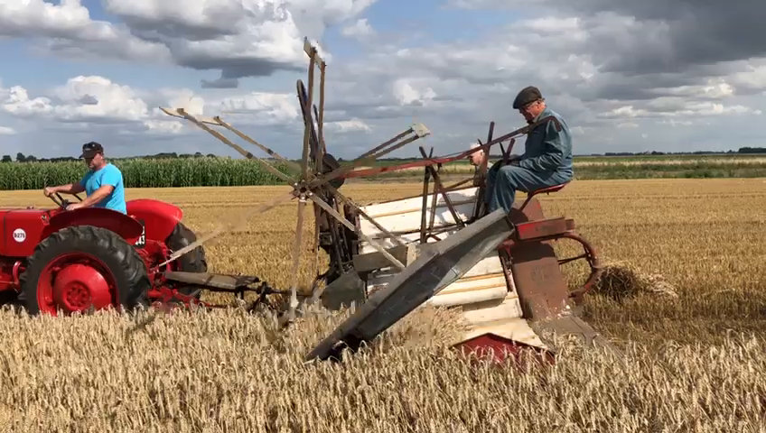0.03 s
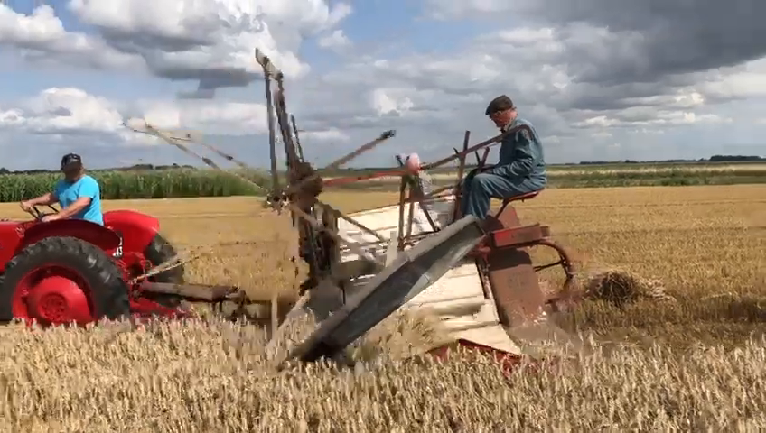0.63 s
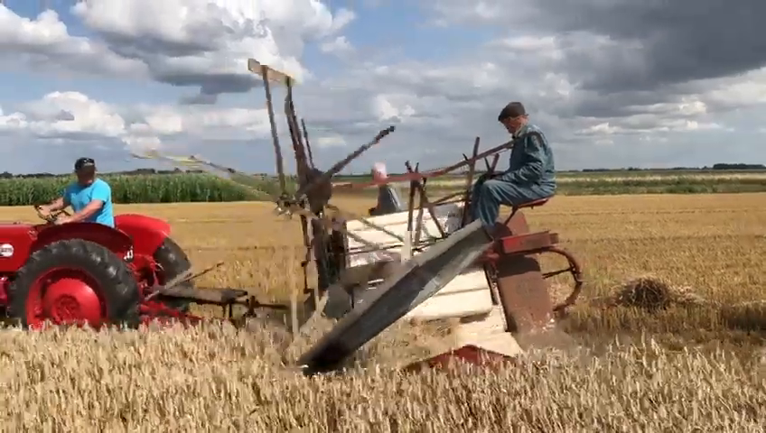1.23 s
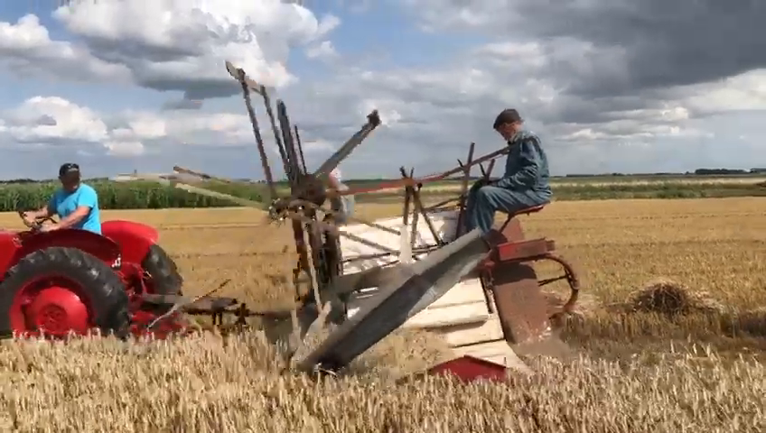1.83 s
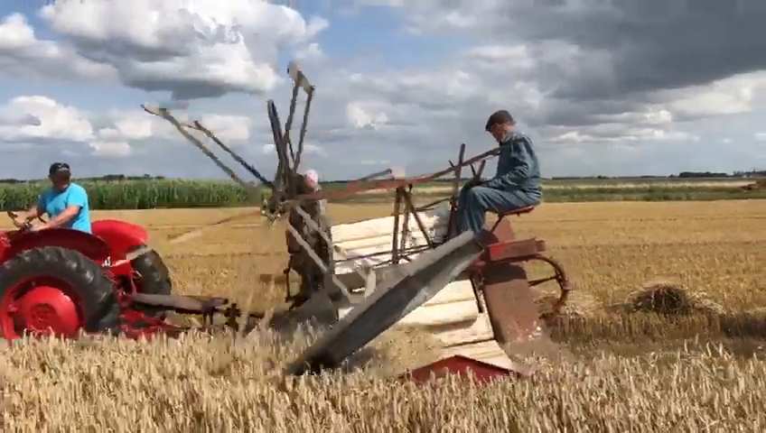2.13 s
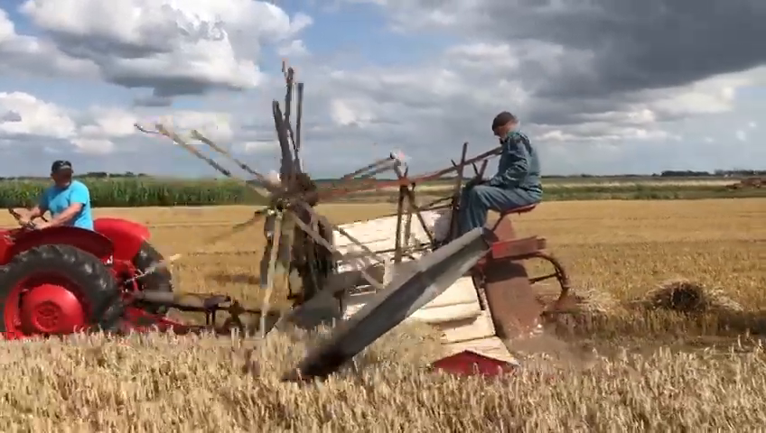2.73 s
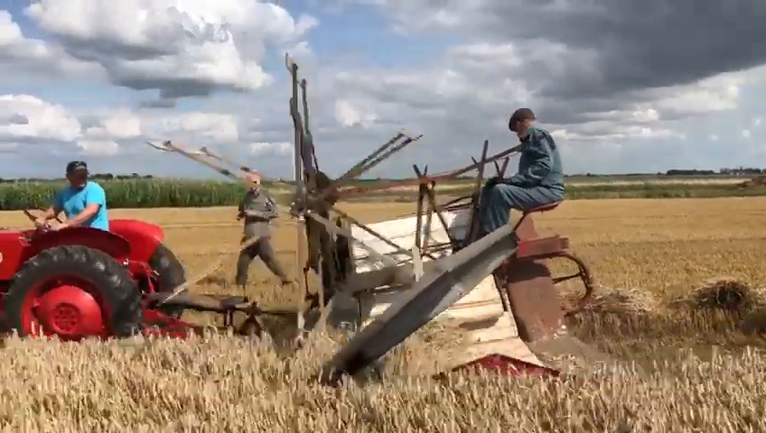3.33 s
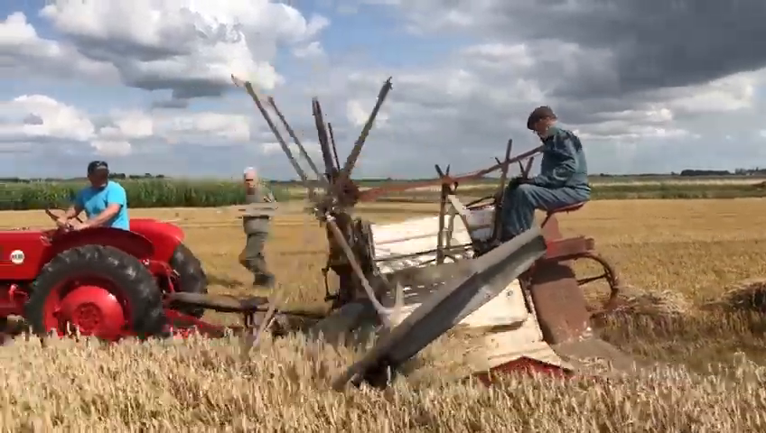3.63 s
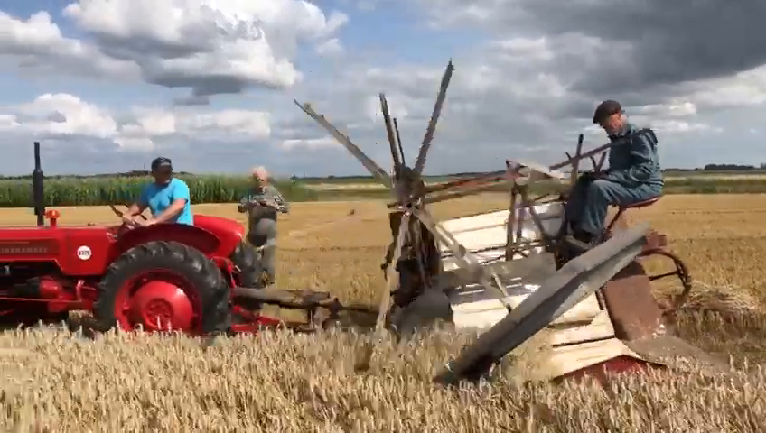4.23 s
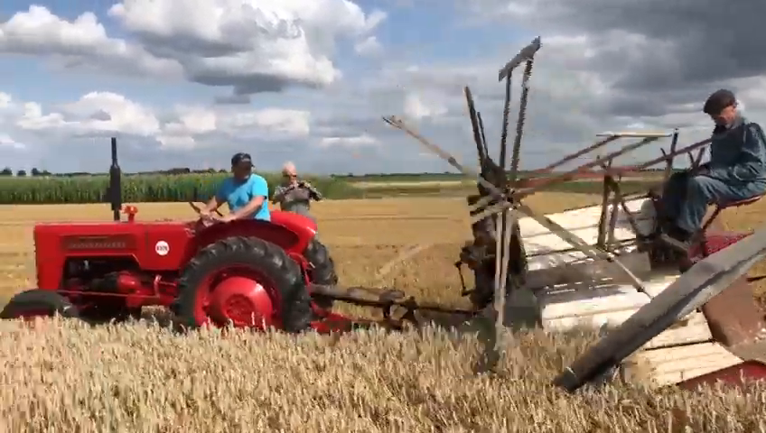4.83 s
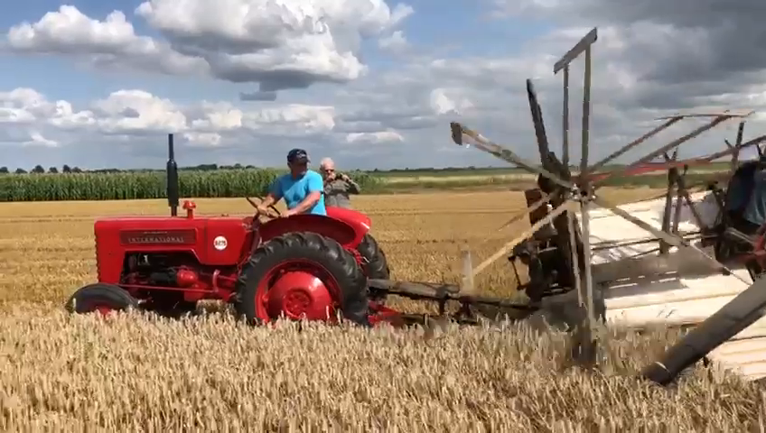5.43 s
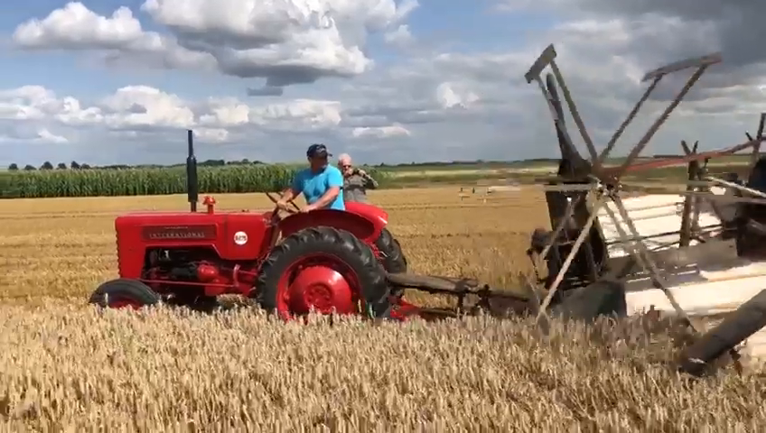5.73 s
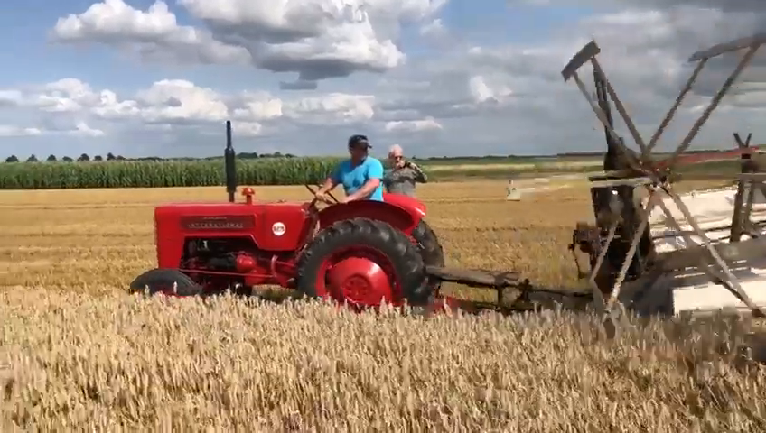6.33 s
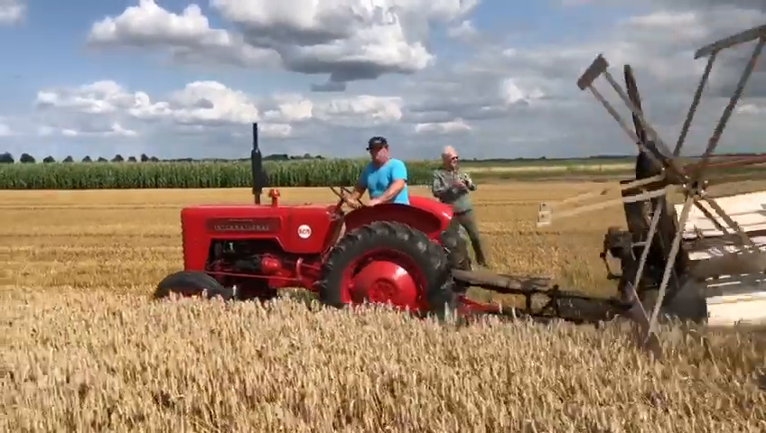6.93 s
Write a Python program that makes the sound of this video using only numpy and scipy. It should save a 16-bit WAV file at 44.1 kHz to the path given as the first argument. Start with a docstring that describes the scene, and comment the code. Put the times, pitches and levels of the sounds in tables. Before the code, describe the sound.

A diesel tractor drones from start to finish, about seven seconds, with a rapid engine knock and a faint wavering gear whine. The old reaper it tows adds a low rumble, a continuous rattle of chains and slats, and irregular iron clanks, wooden knocks and small ticks. Dry straw rustles and snaps through it, swelling gently about every two and a half seconds. A dry bearing gives short, high squeaks, frequent until about 4 seconds, then sparser and fainter. Hollow thuds come near 1.4 and 2.2 seconds. The engine rises slightly around 4 seconds and sags around 5.5, its knocking and ticking growing clearer as the rig draws a little nearer. Brief low puffs of wind bump the microphone near 4.5, 5.5 and 6.9 seconds. At about 6.4 the machine jolts with a thud and extra clatter. The field is open, with no echo.

```python
"""A four-cylinder diesel tractor tows an old reaper-binder through standing grain in an open field.
The exhaust drones, the gears whine and the engine knocks once per firing. Behind it the binder
rumbles, rattles, clanks and chirps at a dry bearing while straw rustles through, swelling with
each sheaf. The rig draws slightly nearer to one microphone, which a few puffs of wind bump."""
import sys
import numpy as np
from scipy import signal
from scipy.fft import rfft, irfft, next_fast_len
from scipy.io import wavfile
from scipy.ndimage import map_coordinates

SR = 44100
rng = np.random.default_rng(int(sys.argv[2]) if len(sys.argv) > 2 else 0)


def generate_wav(signal):
    """Clip the signal to [-1, 1] and save it as 16-bit WAV at the path in sys.argv[1]."""
    frames = np.transpose(np.atleast_2d(signal))
    scaled = np.clip(frames, -1, 1) * 32767
    pcm = np.round(scaled).astype(np.int16)
    wavfile.write(sys.argv[1], SR, pcm)


N = 308700

# the rig's nearness to the microphone, as a gain: t/s, level/dB
NEARNESS = [(0, -0.5), (1.2, -1), (3, 0.5), (4, 1.6), (5.3, 1.2), (6.3, 2.43), (7, 1.5)]


def tractor():
    """Exhaust, gears and cylinders all run locked to one count of the firings."""
    # engine speed: t/s, firing rate/Hz
    speed = [(0, 42), (3, 41.5), (4, 43.9), (4.3, 44.2), (4.8, 43), (5.5, 39.5), (6.3, 41), (7, 42.5)]
    firings = np.cumsum(curve(speed)) / SR
    return exhaust(firings) + gear_whine(firings) + combustion(firings)


def exhaust(firings):
    """The exhaust pulses drone; the upper tones brighten as the tractor nears."""
    # exhaust tones: multiple of the firing rate, relative level/dB
    orders = [(1, -15.5), (1.5, -13), (2, -0.5), (3, -6), (4, -14.5), (5, -17), (6, -16.5)]
    lift_db = 0.88 * curve(NEARNESS)
    tones = np.zeros(N)
    for k, db in orders:
        gain = amp(db + lift_db * (k > 2) + 0.63 * wobble(10))
        tones += gain * np.sin(2 * np.pi * (k * firings + rng.random()))
    return np.sqrt(2) * amp(level_db("exhaust")) * tones


def gear_whine(firings):
    """Meshing gears whine; backlash makes them waver in level and phase."""
    # mesh tones: multiple of the firing rate, relative level/dB
    meshes = [(15.5, -3), (24, 1)]
    # whine at the microphone: t/s, level/dB
    whine = [(0, -51), (1.1, -46.5), (2.5, -45.5), (3.3, -50), (7, -55)]
    tones = np.zeros(N)
    for k, db in meshes:
        tones += amp(db + 2.2 * wobble(5)) * np.sin(2 * np.pi * k * firings + 1.45 * wobble(14))
    return np.sqrt(2) * amp(curve(whine)) * tones


def combustion(firings):
    """Each firing knocks the block and ticks an injector, a little early or late, never equally hard."""
    # spectrum of the engine block: f/Hz, level/dB
    block = [(150, -26.5), (350, -4.5), (640, 5.5), (850, -4), (1250, -0.5), (2000, -8), (3000, -13.5),
             (4500, -14.5), (7000, -29), (12000, -38)]
    # spectrum of the injector ticks: f/Hz, level/dB
    injectors = [(1500, -36), (3000, -8), (4700, 5), (6800, 0.5), (8500, -6), (10300, -14), (12000, -17)]
    # the ticks grow as the engine's side comes into view: t/s, level/dB
    ticking = [(0, -71), (2.3, -45.5), (3, -42), (4.5, -47), (5.4, -41.5), (6.3, -39.5), (7, -39)]
    starts = np.flatnonzero(np.diff(np.floor(firings + .025 * wobble(40))) > 0)
    knocks = bursts(starts, amp(rng.standard_normal(N)[starts]), t60=.07)
    ticks = bursts(starts, amp(1.3 * rng.standard_normal(N)[starts]), t60=.055)
    knocking = amp(level_db("knock")) * unit(colour(knocks, block))
    return knocking + amp(curve(ticking)) * unit(colour(ticks, injectors))


def binder():
    """The load builds and eases with each sheaf, and the crop feeds in unevenly."""
    peak_s, sheaf_period_s = 1.7, 2.5
    load = np.cos(2 * np.pi * (np.arange(N) / SR - peak_s) / sheaf_period_s)
    feed_db = 1.05 * wobble(5.6)
    return rumble(0.5 * load) + rattle(0.9 * load + feed_db) + straw(load, feed_db)


def rumble(load_db):
    """Wheels and canvas roll with a low rumble of overlapping bumps."""
    # spectrum of the running gear: f/Hz, level/dB
    spectrum = [(25, -33), (42, -5), (60, -4), (100, 4), (160, 0.5), (230, -1), (340, -5.5), (500, -11),
                (900, -27)]
    bumps = contacts(rate=150, spread_db=1.5, t60=0.12)
    return amp(level_db("rumble") + load_db) * unit(colour(bumps, spectrum))


def rattle(load_db):
    """Chains and slats rattle the frame, and steel parts sing along."""
    # spectrum of the frame: f/Hz, level/dB
    spectrum = [(200, -26.5), (380, -10), (540, -1), (660, 0), (820, -6.5), (1020, -5), (1300, -7),
                (1700, -8.5), (2100, -12), (2650, -12), (3300, -18), (6000, -31.5)]
    # resonances of the steel parts: f/Hz, width/Hz, level/dB
    modes = [(1020, 90, -14), (1242, 75, 10), (1285, 31, 2), (1610, 19, -6), (2680, 100, -14),
             (3950, 45, -3), (5660, 160, -4.5)]
    frame = unit(colour(contacts(rate=800, spread_db=0.5, t60=0.054), spectrum))
    steel = unit(resonant(contacts(rate=70, spread_db=2, t60=0.028), modes))
    return amp(level_db("rattle") + load_db + jolt_db()) * frame + amp(level_db("steel")) * steel


def straw(load_db, feed_db):
    """Dry stalks rustle through the binder and snap in clumps."""
    # spectrum of the rustle: f/Hz, level/dB
    spectrum = [(1200, -13), (2600, -3.5), (3300, 2), (4300, 3.5), (5500, 2), (7000, 1), (8500, -4),
                (10300, -2.5), (12000, -13)]
    # breaking stalks: t/s, level/dB
    snapping = [(0, -66), (.7, -59), (1.3, -48), (2, -52), (3.1, -44), (3.8, -49), (4.6, -66), (7, -50)]
    clumps_per_s = 11
    rustle_db = level_db("straw") + load_db + feed_db + 0.6 * wobble(clumps_per_s)
    snap_db = curve(snapping) + feed_db + 1.6 * wobble(clumps_per_s)
    brushing = contacts(rate=420, spread_db=2.5, t60=0.11)
    crackle = amp(-18) * contacts(rate=460, spread_db=9, t60=0.0043)
    snaps = resonant(contacts(rate=42, spread_db=1.5, t60=0.013), [(9000, 17000, 0)])
    return amp(rustle_db) * unit(colour(brushing + crackle, spectrum)) + amp(snap_db) * unit(snaps)


def dry_bearing():
    """The bearing sticks and slips: close modes beat, and each chirp scrapes at an upper resonance."""
    # loud chirps: middle t/s, level/dB, length/s, f/Hz, roughness (0 pure, 1 raspy),
    # scrape against the tone/dB, scrape f/Hz, scrape width/Hz
    chirps = [(0.371, -19.5, .025, 2650, 1, -13.5, 4980, 220),
              (.705, -20.5, .012, 2700, 0.48, -18, 4000, 500),
              (1.032, -26.5, .016, 2610, .75, -17, 4100, 600),
              (1.3, -18.5, 0.017, 2650, 0.5, -18, 4700, 400), (1.749, -24.5, .02, 2546, 1, -5, 4200, 420),
              (1.768, -19.3, .02, 2660, 0.37, -23, 4250, 450),
              (1.964, -21.5, 0.015, 2650, 0.83, -12, 4050, 200),
              (2.134, -22.5, 0.0065, 2640, 0.67, -18, 4000, 500),
              (2.201, -26.5, .009, 2790, 1.1, -14, 4000, 700),
              (2.764, -19, 0.021, 2610, .45, -22, 4700, 900), (3.089, -29, .011, 2640, .3, -18, 4500, 900),
              (3.237, -18.5, .013, 2665, .05, -26, 5200, 400),
              (3.534, -25.5, 0.016, 2740, 0.96, -5.5, 4000, 300),
              (3.939, -24.5, 0.018, 2480, 1.2, -0.5, 4360, 750),
              (3.974, -28, 0.018, 2880, .8, -9, 4600, 800), (4.192, -27, 0.028, 2620, 1.1, -8, 4900, 800),
              (4.944, -29, 0.032, 2470, 1.5, -3, 4640, 1500),
              (5.885, -28, .012, 2730, 0.73, -16, 4600, 800),
              (6.712, -27.5, 0.0092, 2730, .71, -14, 4600, 800)]
    # modes that beat with the pitch: offset/Hz, level at roughness 1/dB
    close_modes = [(-190, -1), (170, -4)]
    # upper resonances common to all chirps: f/Hz, width/Hz, level/dB
    upper_modes = [(4020, 400, -4), (9780, 480, 0)]
    flutter_per_s, flutter_rad, rise_per_s = 300, .55, 1.8
    out, t = np.zeros(N), np.arange(-SR // 20, SR // 20) / SR

    def mode(hz, rough):
        cycles = hz * (t + rise_per_s * t ** 2 / 2) + rng.random()
        return np.sin(2 * np.pi * cycles + rough * flutter_rad * wobble(flutter_per_s, len(t)))

    faint = [(s, db, .01, 2700, .85, -14, 4500, 800) for s, db in scattered(1.3, db=-35, spread_db=1)]
    for s, db, length, hz, rough, scrape_db, scrape_hz, scrape_width in chirps + faint:
        swell = amp(-6 * (2 * t / length) ** 2)
        beating = sum(amp(level) * mode(hz + offset, rough) for offset, level in close_modes)
        rasp = amp(-5.5) * noise_band(hz, 750, len(t))
        tone = with_energy(swell * (mode(hz, rough) + rough * (beating + rasp)), swell)
        scrape = with_energy(swell * noise_band(scrape_hz, scrape_width, len(t)), swell)
        ring = with_energy(swell * resonant(rng.standard_normal(len(t)), upper_modes), swell)
        add(out, s + t[0], amp(db) * (tone + amp(scrape_db) * scrape + rough * amp(-16) * ring))
    return out


def clanks():
    """Loose iron and wood crack and give a short, dense clatter; single slats knock and pins tick."""
    # hollow knocks of wooden slats: t/s, level/dB
    slats = [(2.205, -18.5), (2.869, -24), (3.183, -21), (3.201, -19.5), (4.128, -24.5), (4.875, -26),
             (5.073, -23), (6.296, -22)]
    # ticks of steel pins and chain links: t/s, level/dB, t60/s, f/Hz, width/Hz
    pins = [(0.877, -30.5, .07, 3000, 2200), (0.987, -26.5, 0.058, 5530, 700),
            (1.481, -26, 0.067, 3940, 500), (1.723, -16, .0032, 8500, 5500), (1.84, -36, .2, 4030, 160),
            (2.244, -30, .035, 9400, 3000), (2.863, -29, 0.04, 2950, 1300), (2.942, -27, .04, 2800, 1200),
            (3.191, -22.5, 0.04, 2900, 900), (3.416, -29, 0.045, 3900, 900),
            (3.654, -26, 0.036, 3100, 1500), (4.802, -24, .055, 3260, 3200), (5.279, -26, .1, 2190, 1400),
            (6.219, -22, .035, 4800, 1500), (6.607, -25, .035, 4700, 1200)]
    # blows of the packer arms and linkage: t/s, level/dB, crack against the clatter/dB
    blows = [(.49, -24.5, -24), (.553, -22, -24), (.716, -21.5, -12), (.873, -24, -8), (0.974, -25.5, -11),
             (1.357, -26.5, -6), (1.451, -23.5, -15), (2.107, -24.5, -20), (2.304, -30, -5),
             (2.467, -23.5, -19), (2.594, -22.5, -14), (2.914, -32, -11), (3.077, -34, -19),
             (3.555, -21.5, -18), (3.721, -22, -18), (3.734, -21.5, -22), (3.791, -27, -14),
             (3.856, -31, -1), (3.874, -19.5, -11), (4.031, -23.5, -15), (4.157, -26, -8),
             (4.421, -26, -16), (4.8, -18.5, -15), (5.278, -24, -15), (5.335, -24, -18), (5.38, -29, -7),
             (5.806, -24, -20), (5.881, -29, -19), (5.954, -32, -18), (6.05, -32, -9), (6.124, -24, -16),
             (6.15, -24, -16), (6.247, -29, -17), (6.297, -24, -11), (6.363, -31, 1), (6.395, -32, -15),
             (6.419, -26, -9), (6.441, -28, -5)]
    # spectrum of a blow's clatter: f/Hz, level/dB
    spectrum = [(150, -38), (400, 8), (750, 0), (1300, 7.5), (1900, 2.5), (2500, 1.5), (3400, -0.5),
                (5000, -7.5), (8000, -27), (12000, -36)]
    attack_s, light_crack_db = 0.00046, -30
    out, size = np.zeros(N), SR // 4
    for s, db in slats:
        add(out, s, amp(db) * decay(t60=0.055) * noise_band(477, 250, size))
    for s, db, t60, hz, width in pins:
        add(out, s, amp(db) * decay(t60) * noise_band(hz, width, size))
    light_blows = [(s, db, light_crack_db) for s, db in scattered(2.5, db=-30.5, spread_db=2.5)]
    rise = 1 - np.exp(-np.arange(size) / SR / attack_s)
    for s, db, crack_db in blows + light_blows:
        clatter = rise * decay(t60=0.091) * unit(colour(rng.standard_normal(size), spectrum))
        crack = decay(t60=0.069) * noise_band(7500, 7900, size)
        add(out, s, amp(db) * (clatter + amp(crack_db) * crack))
    return out


def chain():
    """Loose links and slats tap at uneven moments, each with its own short ring."""
    # resonance of each loose part: f/Hz, width/Hz, relative level/dB
    loose_parts = [(497, 260, -6), (660, 250, 0), (1110, 310, -3), (1445, 560, -3.5), (1810, 170, -5.5),
                   (2910, 640, -3.5)]
    out = np.zeros(N)
    for hz, width, db in loose_parts:
        times, tap_db = np.transpose(scattered(rate=9))
        taps = bursts((times * SR).astype(int), amp(tap_db), t60=0.056)
        out += amp(db) * unit(resonant(taps, [(hz, width, 0)]))
    return amp(level_db("chain") + jolt_db()) * unit(out)


def deck():
    """The wooden deck booms under the tumbling crop and thuds when the frame drops."""
    # hollow boom of the deck: t/s, level/dB
    boom = [(0, -44), (.8, -59), (1.5, -38.5), (2.3, -48.5), (3, -43.5), (3.9, -45.5), (5.3, -50), (6, -49),
            (6.4, -35.5), (7, -44)]
    # heavy drops of the frame: t/s, level/dB
    drops = [(1.44, -27), (2.225, -24.5), (6.385, -24), (6.415, -26), (6.765, -30)]
    deck_hz, fade = 217, decay(t60=0.088)
    tumbling = contacts(rate=60, spread_db=1, t60=0.068)
    out = amp(curve(boom)) * unit(resonant(tumbling, [(deck_hz, 94, 0)]))
    for s, db in drops:
        thud = resonant(fade * rng.standard_normal(len(fade)), [(deck_hz, 155, 0)])
        add(out, s, amp(db) * with_energy(thud, fade))
    return out


def wind():
    """Each eddy pushes the diaphragm through a few uneven swings, with a low turbulent rush."""
    # puffs on the microphone: middle t/s, level/dB, length/s, f/Hz
    puffs = [(4.279, -26, 0.058, 58.5), (4.555, -22.5, 0.076, 67.4), (5.432, -19.5, 0.055, 80.4),
             (5.502, -22.5, 0.018, 171), (5.52, -16, 0.022, 147.3), (6.659, -27, 0.036, 68.4),
             (6.887, -21, 0.032, 126)]
    out, t = np.zeros(N), np.arange(-SR // 5, SR // 5) / SR
    for s, db, length, hz in puffs:
        swing = np.sin(2 * np.pi * hz * t + wobble(hz * 0.592, len(t)))
        rush = amp(-9) * noise_band(1.03 * hz, 2.5 * hz, len(t))
        add(out, s + t[0], amp(db - 10 * (2 * t / length) ** 2) * (swing + rush))
    return out


def level_db(part):
    """Level of one part of the rig as it draws nearer."""
    # by part: level/dB, dB gained per dB of nearness
    parts = {"exhaust": (-32, 0.45), "knock": (-37, 1.8), "rumble": (-34, 0.69), "rattle": (-30.5, 0.49),
             "steel": (-42, -0.36), "straw": (-37.5, -0.23), "chain": (-40, 0)}
    db, growth = parts[part]
    return db + growth * curve(NEARNESS)


def jolt_db():
    """Extra shaking as the wheels cross rough ground."""
    # jolts: middle t/s, added level/dB, length/s
    jolts = [(3.203, 0, 0.077), (3.74, 1, 0.1), (4.05, 1.5, 0.17), (6.376, 3.2, 0.14), (6.9, 1.5, .2)]
    t = np.arange(N) / SR
    return sum(db * np.exp(-(2 * (t - s) / length) ** 2) for s, db, length in jolts)


def amp(db):
    """Decibels to gain."""
    return 10 ** (np.asarray(db) / 20)


def unit(x):
    """Scale to rms 1."""
    return x / np.sqrt(np.mean(x ** 2) + 1e-20)


def with_energy(x, envelope):
    """Scale x to the energy of the envelope."""
    return x * np.linalg.norm(envelope) / np.linalg.norm(x)


def curve(rows):
    """One value per sample from rows of (t/s, value)."""
    return np.interp(np.arange(N) / SR, *np.transpose(rows))


def wobble(rate, size=N):
    """A smooth random curve, rate knots a second."""
    knots = rng.standard_normal(int(size * rate / SR) + 4)
    return map_coordinates(knots, [np.arange(size) * rate / SR])


def decay(t60):
    """A quarter second of decay from full level."""
    return amp(-60 * np.arange(SR // 4) / SR / t60)


def colour(x, points):
    """Causal filter with the gain of (f/Hz, level/dB) points."""
    m = 2 * next_fast_len(len(x) // 2 + 8192)
    hz, db = np.transpose(points)
    gain = amp(np.interp(np.log(np.fft.rfftfreq(m, 1 / SR) + 1), np.log(hz), db))
    cepstrum = irfft(np.log(gain))
    cepstrum[1:m // 2] *= 2  # folding gives minimum phase
    cepstrum[m // 2 + 1:] = 0
    return irfft(rfft(x, m) * np.exp(rfft(cepstrum)))[:len(x)]


def resonant(x, modes):
    """x through resonances (f/Hz, width/Hz, power/dB), each applied twice for steep skirts."""
    m = next_fast_len(len(x) + 8192)
    f = np.fft.rfftfreq(m, 1 / SR)
    response = sum(amp(db) / np.sqrt(width) * (1j * f * width / (hz * hz - f * f + 1j * f * width)) ** 2
                   for hz, width, db in modes)
    return irfft(rfft(x, m) * response, m)[:len(x)]


def noise_band(hz, width, size):
    """Noise of rms 1 through one resonance."""
    return unit(resonant(rng.standard_normal(size), [(hz, width, 0)]))


def bursts(starts, sizes, t60):
    """Noise of rms 1 that jumps up at each start sample and dies away."""
    kicks = np.bincount(starts, sizes ** 2, N)[:N]
    power = signal.lfilter([1], [1, -amp(-120 / (t60 * SR))], kicks)
    return unit(np.sqrt(power) * rng.standard_normal(N))


def contacts(rate, spread_db, t60):
    """Small contacts of unequal size at random moments, about rate a second."""
    starts = np.flatnonzero(rng.random(N) < rate / SR)
    return bursts(starts, amp(spread_db * np.clip(rng.standard_normal(N)[starts], -2, 2)), t60)


def scattered(rate, db=0, spread_db=0):
    """Rows (t/s, level/dB) of small events, one somewhere in every 1 / rate seconds."""
    return [((k + when) / rate, db + spread_db * (1 - 2 * size))
            for k, (when, size) in enumerate(rng.random((128, 2))) if k + when < rate * N / SR]


def add(track, s, sound):
    """Mix a sound into the track from time s."""
    part = track[max(round(s * SR), 0):][:len(sound)]
    part += sound[:len(part)]


def scene():
    """Open field: everything reaches the one microphone directly."""
    return (tractor() + binder() + chain() + deck() + dry_bearing() + clanks() + wind())[None]


def record(dry):
    """The microphone opens just after the start, sheds deep rumble and cuts off the highest treble."""
    open_s, low_cut_hz, top_hz = .083, 33.8, 11950
    thinned = signal.sosfilt(signal.butter(4, low_cut_hz, "highpass", fs=SR, output="sos"), dry)
    opened = thinned * (np.arange(N) / SR > open_s)
    m = next_fast_len(N + 8192)
    return irfft(rfft(opened, m) * (np.fft.rfftfreq(m, 1 / SR) < top_hz), m)[:, :N]


dry = scene()
out = record(dry)
generate_wav(out)
```